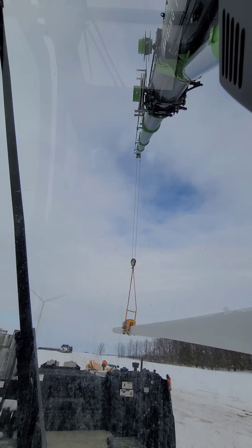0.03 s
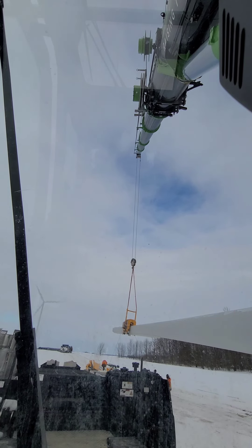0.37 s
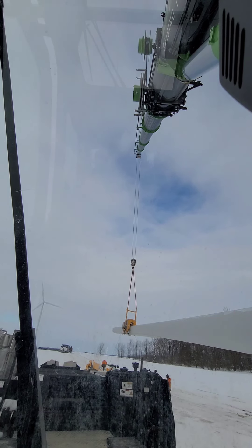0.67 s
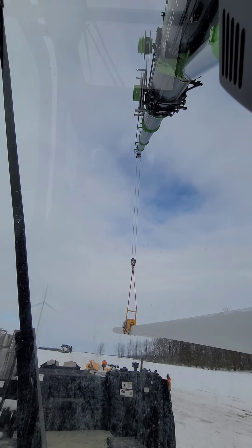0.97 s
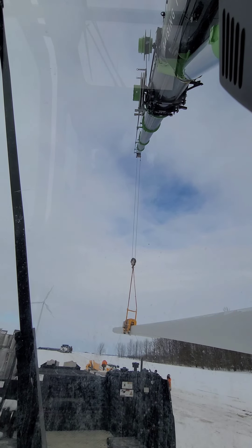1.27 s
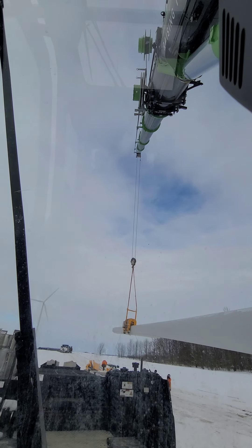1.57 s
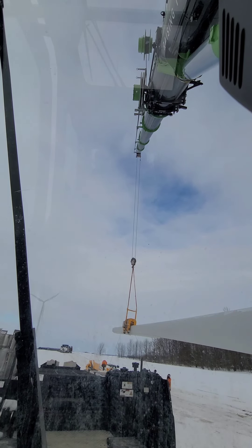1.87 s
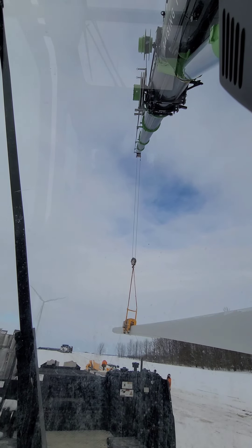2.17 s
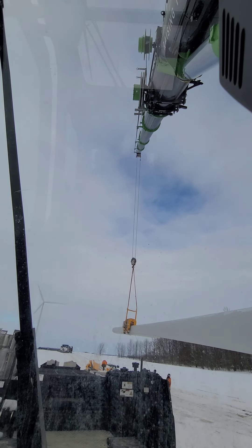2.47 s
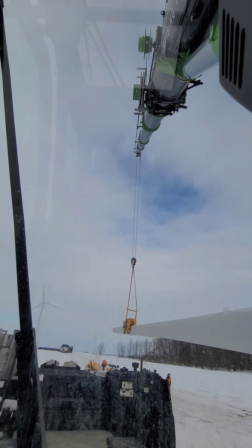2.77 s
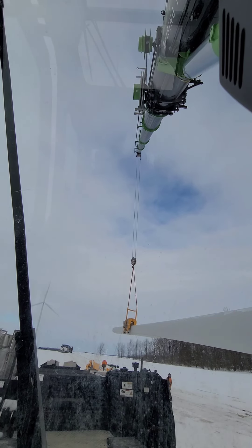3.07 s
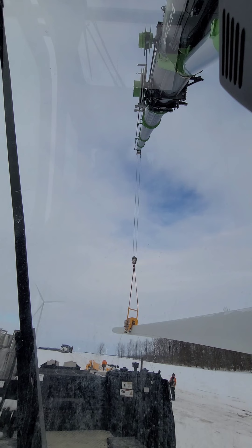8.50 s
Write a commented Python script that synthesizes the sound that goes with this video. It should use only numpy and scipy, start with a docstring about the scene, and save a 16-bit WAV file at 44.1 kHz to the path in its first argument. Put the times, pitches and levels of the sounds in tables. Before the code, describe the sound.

Inside a closed crane cab, light ticks speed up and slow down over a steady diesel drone and soft hydraulic hiss.

```python
"""In the closed cab of a mobile crane hoisting a load, a stereo microphone at the seat. From the start
the diesel holds its speed: its firing note beats against the fan over a rumble that rings the cab,
while gears whine and the hydraulics hiss and sing faintly. Close by, the plunger of the winch's
rotation indicator starts ticking, faster as the drum speeds up. Around four seconds in, the control
lever clicks twice and the pump's note swells. The ticks then slow and pick up again."""
import sys
import numpy as np
from scipy import signal
from scipy.fft import rfft, irfft
from scipy.io import wavfile

SR = 44100
rng = np.random.default_rng(int(sys.argv[2]) if len(sys.argv) > 2 else 0)


def dump_mix(stems):
    """Bounce the given channels to the path in sys.argv[1] as a 16-bit WAV at rate SR."""
    frames = np.atleast_2d(stems).T  # one column per channel
    limited = np.clip(frames, -1, 1)  # hard clip at full scale
    pcm = np.round(limited * 32767).astype(np.int16)
    wavfile.write(sys.argv[1], SR, pcm)


N = 385434
TIME = np.arange(N) / SR
FREQ = np.fft.rfftfreq(N, 1 / SR)
SOFT_ENDS = signal.windows.tukey(N, .002)


def undb(db):
    """Decibels to gain."""
    return 10 ** (np.asarray(db) / 20)


def curve(table, column=1):
    """One column of a table, joined by straight lines in time."""
    rows = np.array(table)
    return np.interp(TIME, rows[:, 0], rows[:, column])


def across(table, column=1):
    """One column of a table, joined by straight lines in log frequency."""
    rows = np.array(table)
    return np.interp(np.log(FREQ + 1), np.log(rows[:, 0]), rows[:, column])


def noise():
    """Spectrum of white noise at 0 dB per Hz."""
    return rfft(rng.standard_normal(N)) * np.sqrt(SR / 2)


def walk(rate):
    """Smooth random motion of spread 1, up to about rate changes a second."""
    motion = irfft(noise() * np.exp(-(FREQ / rate) ** 2), N)
    return motion / motion.std()


def fade(t60):
    """Decay by 60 dB in t60 seconds."""
    return np.exp(-np.minimum(np.log(1000) * TIME / t60, 100))


def resonance(hz, width, db):
    """Gain of one resonance at every frequency."""
    return undb(db) / (1 + ((FREQ - hz) / width) ** 2)


def add(out, start_s, sound):
    """Mix in the first quarter second of a stereo sound."""
    start = max(int(start_s * SR), 0)
    size = min(SR // 4, N - start)
    out[:, start:start + size] += sound[:, :size]


# The stereo image at the seat. Each row: frequency in Hz, left minus right in dB, likeness of the
# sides from 0 to 1, phase lead of the left in radians.
SEAT_IMAGE = [(50, -1.3, .999, 0), (90, -2.3, .992, 0), (150, -4.4, .97, .05), (250, -4.1, .99, -.1),
              (350, -6.2, .95, -.25), (440, -1.5, .94, -.1), (530, -4, .68, .6), (620, .5, .7, -.3),
              (730, -3.3, .3, -1.2), (870, -8.5, .6, -2.8), (1000, -6.5, .4, -2.6), (1110, -6.8, .6, -1.7),
              (1240, -1.5, .45, -3), (1510, -8, .68, -2.6), (1760, -1.5, .35, -1.6), (1920, -6, .35, -.8),
              (2600, -.5, .55, 1), (4000, 2.5, .45, 1.3), (6500, 8.5, .45, 1.4), (15000, 7, .45, 1.4)]
def in_cab(direct, diffuse):
    """Two spectra to stereo: both sides hear nearly the same bass; higher up, reflections part them."""
    pan_db = across(SEAT_IMAGE)
    alike = np.clip(across(SEAT_IMAGE, column=2), 0, 1)
    lead = across(SEAT_IMAGE, column=3)
    right = alike * direct * np.exp(-1j * lead) + np.sqrt(1 - alike ** 2) * diffuse
    return irfft(np.array([direct * undb(pan_db / 2), right * undb(-pan_db / 2)]), N)


def tones(table, phase, waver_hz):
    """Tones that follow the crankshaft, wavering in strength and phase."""
    out = 0
    for multiple, db, waver in table:
        drift = (walk(waver_hz) + 1j * walk(waver_hz)) / np.sqrt(2)
        sway = (1 + waver * drift) / np.hypot(1, waver)
        rotation = np.exp(1j * (multiple * phase + rng.uniform(0, 2 * np.pi)))
        out = out + np.sqrt(2) * undb(db) * np.real(sway * rotation)
    return out


# Deep tones of the engine and what it drives. Each row: multiple of the firing rate, level in dB,
# depth of waver.
DRONE_TONES = [(.413, -25.5, 0.2), (.5, -28.5, 0), (.5385, -23.5, 0), (.8333, -41, .3), (1.346, -37.5, 0.7),
               (2.013, -36, 0.6)]
# The boom inside the cab. Each row: time in seconds, gain in dB.
BOOM_GAIN = [(0, 1.5), (1.05, -4.5), (1.4, 3), (2.1, -3.5), (2.8, -1), (3.25, -1.5), (3.6, 1.5),
             (3.95, 2.5), (4.3, -4), (4.8, 4.5), (5.2, -2), (5.75, 1.5), (6.4, -6), (7.1, -6.5), (7.5, 0),
             (8.74, 0.5)]
def diesel(phase):
    """The engine from behind closed doors: a deep drone, and a boom where firing note and fan beat."""
    drone = tones(DRONE_TONES, phase, waver_hz=0.92)
    firing = tones([(0.99, -22, 0.46)], phase, waver_hz=4.2)
    fan = tones([(1.077, -23.5, 0.14)], phase, waver_hz=7.1)
    boom = (firing + fan) * undb(curve(BOOM_GAIN))
    spectrum = rfft((drone + boom) * SOFT_ENDS)
    return in_cab(spectrum, spectrum)


# Gear and pump tones, then winch tones. Each row: multiple of the firing rate, relative level in dB,
# depth of waver.
GEAR_TONES = [(2.505, -37, 0.7), (3.359, -39, 0.3), (3.98, -39, 0.7), (4.475, -40.5, 0.9),
              (5.453, -54, 0.9), (6.26, -43.5, 0.1), (6.354, -50.5, 0.5), (7.29, -49.5, 0.3),
              (7.344, -47, 0.4), (7.87, -65.5, 0.1), (12.35, -59, 0.98)]
WINCH_TONES = [(9.51, -53.5, 0), (18.9, -58, 0.9), (18.7, -63, 0.9), (41.9, -75, 0.92), (72, -87.5, 1.26)]
# Oil flow through the valves. Each row: time in seconds, hiss gain in dB, winch gain in dB.
OIL_FLOW = [(0, -1.5, -14), (1, -1.6, -10.5), (2.5, -1.5, -2.5), (4.8, -1.5, -5.5), (5.8, -1.5, 8),
            (7.3, 0.5, 4.5), (8.74, -1, 9)]
def gear_whine(phase):
    """Gears and winch whine thinly at the seat; the winch grows louder with the drum's work."""
    gears = tones(GEAR_TONES, phase, waver_hz=17)
    winch = tones(WINCH_TONES, phase, waver_hz=7) * undb(curve(OIL_FLOW, column=2))
    spectrum = rfft((gears + winch) * SOFT_ENDS)
    return in_cab(spectrum, spectrum)


# Roar coming through the cab walls. Each row: frequency in Hz, level in dB per Hz.
ROAR_SPECTRUM = [(14, -80), (22, -61), (32, -43.5), (75, -59.5), (140, -69), (200, -46.5), (330, -53.5),
                 (500, -55.5), (720, -63), (900, -65.5), (1450, -68), (1850, -75), (2300, -95.5),
                 (5000, -105), (11000, -135)]
# Air and panels around the microphone. Each row: resonance in Hz, half-width in Hz, peak in dB per Hz.
CAB_MODES = [(61, 12, -40), (90, 13, -42), (107.3, 15, -44), (179, 27.7, -43.5), (222.3, 14, -42),
             (247.3, 27.7, -45), (287.6, 28, -50.5), (392, 27, -47), (439, 20.5, -49), (562, 11, -63.5),
             (638, 20, -56.5), (798, 28, -61), (1353, 26, -64.5), (1415, 36, -64.5), (1517, 28, -65.5),
             (1652, 22, -65.5), (1750, 52, -66.5), (1955, 21, -72.5), (2108, 23, -73.5),
             (6230, 160, -100.5)]
def rumble(phase, pulsing=0.063, surge_db=0.28):
    """Combustion roar, swelling a little with each firing, rings the cab's resonances."""
    power = undb(across(ROAR_SPECTRUM)) ** 2
    for hz, width, db in CAB_MODES:
        power = power + resonance(hz, width, db) ** 2
    drive = (1 + pulsing * np.cos(phase)) * undb(surge_db * walk(2.9))
    direct, diffuse = (rfft(irfft(noise(), N) * drive) * np.sqrt(power) for _ in range(2))
    return in_cab(direct, diffuse)


# Oil rushing through the valves. Each row: frequency in Hz, relative level in dB.
HISS_SPECTRUM = [(1000, -83), (2300, -80.5), (3200, -81), (4100, -87.5), (5200, -96.5), (6200, -103.5),
                 (7100, -104.5), (8600, -105), (12000, -112), (16000, -115)]
# Thin valve whistles. Each row: pitch in Hz, half-width in Hz, relative peak in dB.
VALVE_WHISTLES = [(2300, 25, -80), (2550, 22, -82), (2730, 30, -81), (2880, 22, -83), (3130, 28, -80),
                  (3297, 10, -78.5), (5900, 110, -99)]
def valves(flutter_db=1.0, swell_db=2.5):
    """Faint hiss that follows the oil flow, with whistles that swell and fade at random."""
    colour = undb(across(HISS_SPECTRUM))
    out = in_cab(noise() * colour, noise() * colour)
    for hz, width, db in VALVE_WHISTLES:
        whistle = resonance(hz, width, db)
        swell = undb(swell_db * walk(3))
        out = out + in_cab(noise() * whistle, noise() * whistle) * swell
    return out * undb(curve(OIL_FLOW) + flutter_db * walk(26))


# The pump's note, strongest around the lever clicks. Each row: time in seconds, level before flutter in dB.
PUMP_LEVEL = [(0, -52), (1.2, -55), (1.9, -48), (3.4, -48.5), (3.8, -39.5), (4.3, -41.5), (4.8, -47.5),
              (7, -46.5), (8.74, -44)]
def pump(note_hz=1085, wander_hz=22, flutter_db=7.5):
    """The hydraulic pump sings a wandering, fluttering note in a reedy band of noise."""
    band = resonance(hz=1079, width=88, db=-60)
    turns = np.cumsum(note_hz + wander_hz * walk(25)) / SR
    note = np.sin(2 * np.pi * turns) * undb(curve(PUMP_LEVEL)) * SOFT_ENDS
    direct = rfft(note * undb(flutter_db * walk(22)))
    diffuse = rfft(note * walk(22))
    return in_cab(direct + noise() * band, diffuse + noise() * band)


def click(colour, t60, tail_db, tail_t60, rise_s=0.00026):
    """A click smeared by close reflections; its treble comes from the left, its body from the right."""
    pan_db = across([(1900, -9.0), (3000, 4.5), (6300, 12.0), (9000, 3.0), (14000, 10)])
    sides = np.array([noise() * undb(pan_db / 2), noise() * undb(-pan_db / 2)])
    envelope = (1 - np.exp(-TIME / rise_s)) * (fade(t60) + undb(tail_db) * fade(tail_t60))
    return irfft(sides * undb(across(colour)), N) * envelope


# Modes of the indicator and its armrest, beside the microphone. Each row: frequency in Hz, seconds to
# fall 60 dB, relative left and right levels in dB.
ARMREST_MODES = [(796, .1, -31, -34), (1071, .1, -31, -28), (1227, .09, -33, -34), (1281, .1, -32, -25),
                 (1367, .1, -46, -29), (1501, .09, -44, -34), (1668, .09, -34, -29.5),
                 (1841, .09, -35, -33), (1889, .11, -36, -29), (1925, .09, -36, -31), (2000, .09, -37, -35),
                 (2153, .12, -41, -42), (2422, .08, -49, -47), (2497, .08, -48, -49), (3063, .08, -46, -53),
                 (3273, .08, -42, -49), (3359, .09, -42, -49), (3773, .08, -46, -54),
                 (4410, .08, -39.5, -46), (4460, .07, -40.5, -47), (4812, .07, -46, -56),
                 (5130, .06, -48, -54), (5254, .08, -43.5, -52), (6131, .07, -47, -58),
                 (6290, .06, -47, -57), (6669, .06, -48, -60), (8031, .06, -56, -65),
                 (8451, .06, -51.5, -62), (8726, .06, -55, -68), (8920, .06, -56, -65),
                 (10653, .06, -59, -64), (11370, .07, -56, -65), (11525, .07, -54, -64),
                 (11610, .07, -57, -66), (13415, .06, -55, -66)]
def armrest_modes(size, build_cycles=11):
    """One stereo ring for each mode; it builds up over some cycles, so low modes come late."""
    time = TIME[:size]
    modes = []
    for hz, t60, left_db, right_db in ARMREST_MODES:
        envelope = (1 - np.exp(-hz * time / build_cycles)) * fade(t60)[:size]
        ring = np.sin(2 * np.pi * (hz * time + rng.random((2, 1))))
        modes.append(undb([[left_db], [right_db]]) * ring * envelope)
    return modes


# Dense clatter of the housing. Each row: frequency in Hz, relative level in dB.
CLATTER_SPECTRUM = [(300, -75.5), (800, -58), (1900, -68), (2400, -72.5), (3300, -72.5), (5000, -83.5),
                    (6500, -87), (7500, -91), (8600, -86.5), (10000, -87), (11500, -91.5), (15500, -97.5)]
# The plunger's contacts in one stroke. Each row: delay in seconds, clatter gain in dB, crack gain in dB.
CONTACTS = [(0, -13, -16), (.003, 0.5, -0.5), (.009, -16, -18)]
# Even ticks while the drum holds a speed. Each row: start in seconds, interval in seconds, stroke count.
TICK_RUNS = [(.168, .558, 2), (1.061, .502, 3), (2.526, .336, 2), (3.126, .229, 3), (3.737, .1395, 4),
             (4.297, .137, 5), (5.231, .316, 2), (5.811, .266, 2), (6.241, .162, 4), (6.916, .187, 6),
             (8.004, .153, 3), (8.462, .169, 2)]
def indicator(tick_db=1.5, scatter_db=1.2, mode_scatter_db=1.7, clatter_db=-3.5, variation=0.46):
    """Close by, a plunger strikes its housing at each step of the drum: a dry clack and a short ring."""
    size = SR // 4
    modes = armrest_modes(size)
    clatters = [click(CLATTER_SPECTRUM, t60=0.081, tail_db=-9.0, tail_t60=0.2)[:, :size]
                for _ in range(len(CONTACTS) * 4)]
    crack = click(CLATTER_SPECTRUM, t60=0.0089, tail_db=-11, tail_t60=0.016, rise_s=0.0001)[:, :size]
    strokes = [first + k * interval for first, interval, count in TICK_RUNS for k in range(count)]
    out = np.zeros((2, N))
    for start in strokes:
        stroke_db = tick_db + scatter_db * rng.standard_normal()
        mode_gains = undb(stroke_db + mode_scatter_db * rng.standard_normal(len(modes)))
        add(out, start, np.tensordot(mode_gains, modes, 1))
        for k, (delay, contact_db, crack_db) in enumerate(CONTACTS):
            # the plunger never seats quite the same way, so a little of the clatter changes
            stray = clatters[rng.integers(len(CONTACTS), len(clatters))]
            clatter = (clatters[k] + variation * stray) / np.hypot(1, variation)
            contact = undb(contact_db + clatter_db) * clatter + undb(crack_db) * crack
            add(out, start + delay, undb(stroke_db) * contact)
    return out


# Modes of the hollow grip. Each row: frequency in Hz, seconds to fall 60 dB, relative level in dB.
GRIP_MODES = [(1290, .08, -5), (1420, .08, -2), (1491, .11, 0), (1590, .09, 1), (1690, .08, -4),
              (1900, .1, -6), (2170, .08, -7), (2290, .06, -10)]
# Snap of the detent. Each row: frequency in Hz, relative level in dB.
SNAP_SPECTRUM = [(500, -61), (1500, -70), (2100, -59.5), (3000, -67), (4500, -77), (7500, -82),
                 (12000, -76.5), (16000, -90)]
# The lever's two clicks. Each row: start in seconds, snap gain in dB, knock gain in dB.
LEVER_CLICKS = [(3.579, -9, -27.5), (4.1225, -2.5, -37)]
def lever(knock_left_db=-9):
    """Within arm's reach, the detent snaps and the hollow grip knocks to the microphone's right."""
    out = np.zeros((2, N))
    grip = sum(undb(db) * np.sin(2 * np.pi * hz * TIME) * fade(t60) for hz, t60, db in GRIP_MODES)
    knock = grip * undb([[knock_left_db], [0]])
    for start, snap_db, knock_db in LEVER_CLICKS:
        snap = click(SNAP_SPECTRUM, t60=0.1, tail_db=-3.0, tail_t60=0.15, rise_s=0.00022)
        add(out, start, undb(snap_db) * snap + undb(knock_db) * knock)
    return out


# The diesel's nearly steady speed. Each row: time in seconds, firing rate in Hz.
FIRING_RATE = [(0, 88.45), (2.5, 88.6), (4, 88.15), (5.6, 88.1), (6.5, 89.1), (8.2, 89.2), (8.74, 88.9)]
def scene():
    """Engine, hydraulics and controls as heard from the seat."""
    phase = 2 * np.pi * np.cumsum(curve(FIRING_RATE)) / SR  # one turn for each firing
    return diesel(phase) + gear_whine(phase) + rumble(phase) + valves() + pump() + indicator() + lever()


def record(dry):
    """The microphone is a phone's, which cuts the top treble steeply."""
    top_hz = 15720
    return signal.sosfilt(signal.ellip(10, .1, 80, top_hz, fs=SR, output="sos"), dry)


dry = scene()
out = record(dry)
dump_mix(out)
```